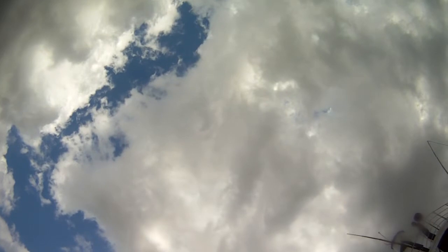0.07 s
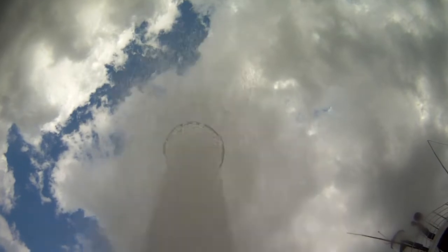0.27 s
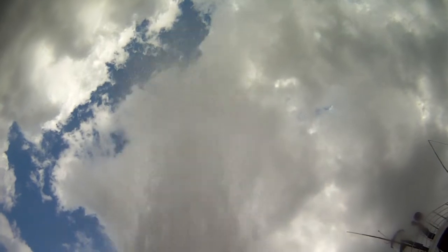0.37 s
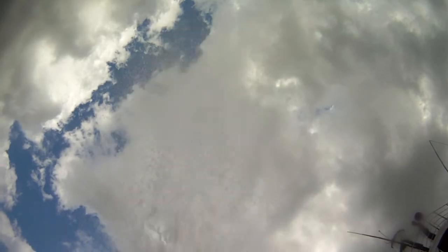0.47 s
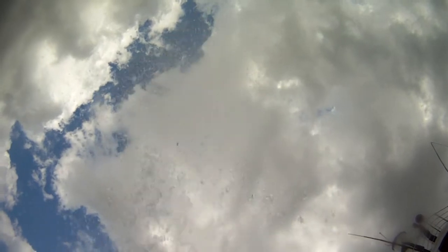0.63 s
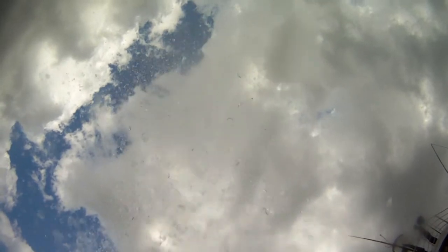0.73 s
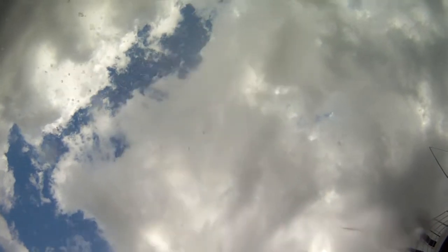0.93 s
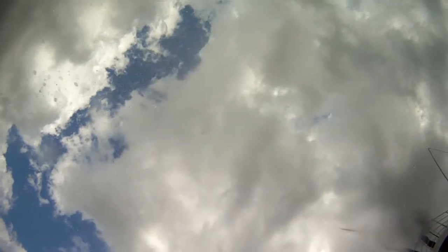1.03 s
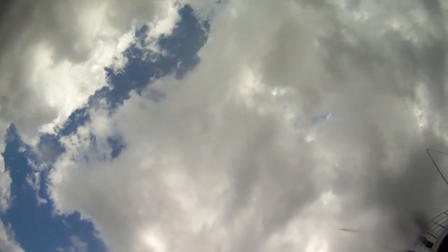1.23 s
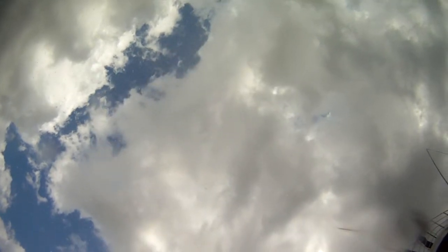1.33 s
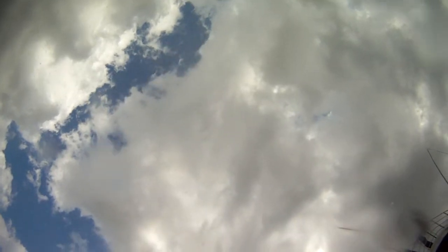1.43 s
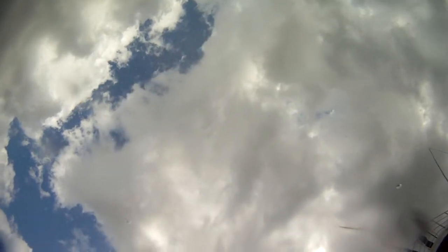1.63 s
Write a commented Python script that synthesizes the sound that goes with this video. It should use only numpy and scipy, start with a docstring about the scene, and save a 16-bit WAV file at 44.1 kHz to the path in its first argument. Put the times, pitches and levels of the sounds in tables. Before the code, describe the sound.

A compressed-air water cannon fires, and its spray rains down, thinning to drops.

```python
"""Compressed-air water cannon

The cannon fires straight up beside a sealed plastic case. The valve clicks, the barrel gulps,
air spits out in three main bursts and the water column leaves with a slap. Spray showers the
case, thins out and ends in single drops. The case colours clicks, air, slap, spray and drops."""
import sys
import numpy as np
from scipy import signal
from scipy.fft import rfft, irfft
from scipy.io import wavfile
from scipy.ndimage import uniform_filter1d, minimum_filter1d

SR = 44100
rng = np.random.default_rng(int(sys.argv[2]) if len(sys.argv) > 2 else 0)


def bounce(signal):
    """Save signal as a 16-bit WAV file at the path given by the first command-line argument."""
    frames = np.transpose(np.atleast_2d(signal))
    limited = np.clip(frames, -1, 1)
    pcm = np.round(limited * 32767).astype(np.int16)
    wavfile.write(sys.argv[1], SR, pcm)


N = 74970

# Spectral shapes. Each row: frequency in Hz, relative gain in dB.
OPEN_AIR_EQ = [(30, 0), (100, -3), (300, -12), (1000, -15), (4000, -24), (8000, -32), (15000, -36)]
RUMBLE_EQ = [(20, -38), (50, -3.5), (95, -0.5), (140, -1), (400, -4.5), (800, -11), (2500, -19),
             (6000, -79)]
PATTER_EQ = [(300, -5.5), (1200, 2.5), (2400, 0), (4500, -11), (6000, -20.5), (10000, -7), (15000, -31)]
CASE_EQ = [(30, -33), (80, -23.5), (180, -10.5), (300, -11.5), (600, -10), (850, -15), (1030, -1.5),
           (1280, 2.5), (1440, 1.5), (1660, 7.5), (1880, 1.5), (2150, 7.5), (2900, -9), (3650, 0),
           (4700, -25.5), (5300, -23.5), (6000, -38.5), (6700, -24.5), (7300, -28.5), (8300, -6.5),
           (9000, -17), (9850, -9), (10900, -16), (12000, -96), (13200, -13), (14150, -13), (15200, -21)]
DROP_BODY_EQ = [(60, 2), (400, 2), (800, -1.5), (1150, 1.5), (1650, -10), (2300, -6), (3600, -4),
                (6000, -16), (8300, -5.5), (14000, 2)]
DROP_TICK_EQ = [(200, -27), (1000, -17), (2800, 0.5), (4500, 9.5), (6000, 19), (8300, 3), (11000, -1.5),
                (15000, -5)]
CLICK_EQ = [(200, -31), (1000, -22), (2000, -19), (3000, -8), (4000, 1), (6000, 2), (8300, -1),
            (10000, -18), (15000, -12)]
SURGE_EQ = [(200, -37), (800, -31), (1150, -10.5), (1500, -15), (1950, -21), (2200, -0.5), (2430, -3.5),
            (2750, -22), (5000, -25.5), (9000, -35), (9900, -19), (11500, -33), (14200, -25), (15500, -48)]
SLAP_EQ = [(60, 8), (300, 16.5), (750, 10), (1150, 0), (1650, -9), (2300, -0.5), (3600, 1.5), (6000, 8),
           (8300, 3), (14000, -1)]
AIR_EQ = [(60, 7), (220, 0), (400, 2.5), (800, 1.5), (1700, -7), (2800, -11.5), (3700, -6), (6000, 8.5),
          (8300, -4.5), (12000, -5.5), (15000, -7)]

# Noise envelopes. Each row: time in seconds, level in dB.
RUMBLE_ENVELOPE = [(0, -71), (.08, -65), (.12, -54.5), (.30, -54), (0.346, -29.5), (.39, -39), (.7, -54),
                   (.98, -47.5), (1.30, -52), (1.69, -52)]
SURGE_ENVELOPE = [(.22, -80), (0.244, -40), (.285, -58), (.30, -45.5), (.325, -39), (.357, -24.5),
                  (.375, -33.5), (.41, -37), (.46, -30), (.52, -85)]
# Spray on the case. Each row: time in seconds, relative body and treble levels in dB.
SPRAY_FLOW = [(.2, -81, -80), (0.281, -50, -55), (.31, -45.5, -46), (.328, -46, -39), (0.341, -40, -52),
              (0.361, -27, -24), (0.374, -40, -37), (.385, -31, -36), (0.418, -14.5, -21),
              (0.439, -11, -16), (0.504, -13, -17), (0.531, -17, -21), (0.6, -15, -14.5), (0.742, -18, -23),
              (.81, -18.5, -21), (0.859, -21.5, -24.5), (0.911, -26, -29), (0.964, -24.5, -29.5),
              (0.989, -30, -37.5), (1.071, -37.5, -44.5), (1.14, -45.5, -57), (1.33, -48.5, -66),
              (1.55, -45.5, -57), (1.69, -45, -57)]

# Case resonances. Each row: frequency in Hz, T60 in seconds, gain over the broad response in dB.
CASE_MODES = [(1016.4, 0.069, 6), (1250.5, 0.12, 8), (1643, 0.08, -0.5), (2092, 0.24, 3.5), (2301, 0.12, 3),
              (2690, 0.063, 1.5), (3540, 0.05, -1), (3814, 0.06, 6.5), (8320, 0.08, 6), (9780, 0.086, 9),
              (14150, 0.046, 1.5)]
WET_CASE_MODES = [(1150, .02, 2), (2230, .02, 0)]
# Modes of the cannon and its air. Each row: frequency in Hz, T60 in seconds, level in dB.
BARREL_MODES = [(94.2, 0.83, -36), (177.7, 0.47, -33), (222, .11, -22.5), (430, 0.099, -38)]
EMPTY_BARREL_MODES = [(175, 0.21, -21.5)]
MUZZLE_MODES = [(68, 0.07, -28), (135, 0.033, -16), (225, 0.026, -7), (340, 0.013, -9), (1080, 0.025, -18)]
CANNON_MODES = [(228.5, 0.055, -9), (415, 0.035, -22), (1152, 0.22, -21.5), (2230, 0.3, -41),
                (9880, 0.19, -37)]
AIR_COLUMN_MODES = [(155.5, 0.2, -23), (307.7, 0.17, -25.5), (464, 0.12, -21.5)]
RECOIL_MODES = [(129, 0.037, -15)]
# Case tones shaken by the air. Each row: frequency in Hz, relative level in dB, RMS wander in Hz.
SQUEAL_TONES = [(2176, -4, 92), (9880, -18, 123), (13900, -22.5, 174)]

# Heavy water landing. Each row: start in seconds, level in dB.
THUD_HITS = [(0.971, -40), (1.226, -38.5), (1.353, -37.5)]
# Water landing in water. Each row: start in seconds, pitch in Hz, T60 in seconds, level in dB.
BUBBLES = [(1.0795, 1215, 0.027, -23), (1.1593, 1290, 0.034, -26.5), (1.1846, 1130, 0.017, -23.5),
           (1.1923, 1130, 0.047, -31), (1.229, 433, .04, -36)]
# Large drops. Each row: start in seconds, relative level in dB, decay in seconds, tick offset in dB.
DROP_HITS = [(.853, -4, 0.0036, -5), (0.9726, -10.5, 0.0028, -8.5), (1.078, -12.5, 0.0046, -22),
             (1.084, -16, 0.0034, -17), (1.14, -26, 0.0083, -6), (1.160, -28.5, 0.0038, -12),
             (1.1786, -28.5, 0.0016, 5.5), (1.22, -29, 0.002, -4), (1.2385, -24, 0.015, -9),
             (1.328, -29.5, 0.002, -10.5), (1.348, -28.5, 0.0027, -4), (1.3548, -21, 0.0015, -13),
             (1.3777, -22.5, 0.0019, 1.5), (1.4115, -24.5, 0.0028, -1), (1.4348, -28, 0.002, 3),
             (1.4486, -21.5, 0.0028, 1.5), (1.4615, -26, 0.0013, 0), (1.478, -29.5, 0.0021, 2),
             (1.4974, -29, 0.0042, 4), (1.507, -26, 0.0034, 0), (1.515, -20.5, 0.0022, -3),
             (1.538, -25, 0.00092, -1), (1.5453, -29, 0.0006, -2), (1.5537, -23.5, 0.0015, -2),
             (1.5815, -24, 0.0011, -7.5), (1.5967, -30, 0.001, -4), (1.634, -25, 0.01, 3),
             (1.6521, -24, 0.00082, -7), (1.668, -26, 0.0018, -10.5)]
# Valve clicks, the first air burst's crack, one late drop. Each row: start in seconds, level in dB.
CLICK_HITS = [(0.0786, -31.5), (0.0836, -35.5), (0.0913, -14.5), (0.0956, -30), (0.105, -27), (0.111, -30),
              (0.1208, -31.5), (0.1266, -35), (.2040, -3), (1.6975, -11)]
# Water slaps. Each row: start in seconds, level in dB, decay in seconds.
SLAP_HITS = [(0.3302, -2.5, 0.0013), (.3310, 8, 0.0014), (0.334, -23.5, 0.025), (0.3419, -12, 0.0025)]
# Air bursts. Each row: centre in seconds, 1/e half-width in seconds, relative level in dB.
AIR_BURSTS = [(0.1933, 0.0023, -18.5), (0.2, 0.0023, -7.5), (0.2063, 0.0016, 6.5), (0.214, 0.0014, -6),
              (0.2186, 0.0015, 8.5), (0.2252, 0.0018, -4), (0.2313, 0.002, 14)]

SLOSH_WAVER, BARREL_ATTACK_S = 0.07, 0.011  # sloshing water bends the barrel's pitch by this share


def undb(db):
    return 10 ** (np.asarray(db) / 20)


def clock():
    return np.arange(N) / SR


def unit_rms(x):
    return x / np.sqrt(np.mean(x ** 2) + 1e-18)


def unit_peak(x):
    return x / np.max(abs(x))


def noise():
    return rng.standard_normal(N)


def envelope(points):
    return undb(np.interp(clock(), *np.array(points).T))


def wobble(rate_hz):
    """Smooth random motion, unit RMS."""
    width = max(int(SR / rate_hz), 2)
    return unit_rms(uniform_filter1d(uniform_filter1d(noise(), width), width))


def response(*curves, size=4096):
    """Minimum-phase, unit-energy impulse response of EQ curves in series."""
    log_hz = np.log(np.arange(size // 2 + 1) * SR / size + 1)
    db = sum(np.interp(log_hz, np.log(eq[:, 0]), eq[:, 1]) for eq in map(np.array, curves))
    cepstrum = irfft(np.log(undb(db)))
    cepstrum[1:size // 2] *= 2
    cepstrum[size // 2 + 1:] = 0
    impulse = irfft(np.exp(rfft(cepstrum)))
    return impulse / np.linalg.norm(impulse)


def through(x, impulse):
    return signal.fftconvolve(x, impulse)[:N]


def hit_case(pushes, eq):
    """Impacts coloured by the case and their own EQ."""
    return through(pushes, unit_peak(response(CASE_EQ, eq)))


def strike(start_s, modes, attack_s, rise_oct_per_s=0, waver=0):
    """Damped sines starting together; waver is RMS pitch deviation as a share."""
    age_s = np.maximum(clock() - start_s, 0)
    rings = 0
    for hz, t60_s, db in modes:
        pitch_hz = hz * 2 ** (rise_oct_per_s * np.minimum(age_s, t60_s))
        pitch_hz *= 1 + waver * wobble(rate_hz=70)
        phase = 2 * np.pi * np.cumsum(pitch_hz * (age_s > 0)) / SR
        rings += undb(db) * np.sin(phase) * np.exp(-np.log(1000) * age_s / t60_s)
    return rings * (1 - np.exp(-age_s / attack_s))


def resonate(x, modes, drift_hz=10):
    """Adds narrow resonances; water on the case keeps shifting their pitch."""
    out = x
    for hz, t60_s, db in modes:
        pole = np.exp(-np.log(1000) / t60_s / SR)
        carrier = np.exp(2j * np.pi * np.cumsum(hz + drift_hz * wobble(rate_hz=25)) / SR)
        ringing = carrier * signal.lfilter([1], [1, -pole], x / carrier)
        out = out + 2 * undb(db) * (1 - pole) * ringing.real
    return out


def splat(start_s, decay_s, splash):
    """A sharp push, then a dying noise burst."""
    age_s = clock() - start_s
    push = np.maximum(1 - abs(age_s * SR), 0)
    burst = noise() * (age_s >= 0) * np.exp(-np.maximum(age_s, 0) / decay_s)
    return push + splash * burst


def grains(flow_db, ref_db=-14, ref_per_s=11000, db_per_decade=24.5, spread_db=3.5):
    """Tiny impacts near unit RMS; weaker flow makes them sparser."""
    rate_per_s = ref_per_s * 10 ** ((flow_db - ref_db) / db_per_decade)
    chance = np.minimum(rate_per_s / SR, 1)
    sizes = undb(spread_db * np.minimum(rng.exponential(size=N), 4)) * np.sign(noise())
    return unit_rms(sizes) * (rng.random(N) < chance) / np.sqrt(chance)


def background():
    """Low buffeting of water and wind over quiet open air."""
    rumble = through(noise(), response(RUMBLE_EQ)) * envelope(RUMBLE_ENVELOPE)
    return rumble + undb(-63.5) * through(noise(), response(OPEN_AIR_EQ))


def patter(start_s=0.48, full_s=1.49):
    """Fine drops fall on the ground all around."""
    swell = np.interp(clock(), [start_s, full_s], [0, 1])
    flicker_db = 2.3 * wobble(rate_hz=120)
    return undb(-48.5 + flicker_db) * swell * through(grains(flow_db=-27), response(PATTER_EQ))


def thuds(hz=95.8, t60_s=0.21):
    """Heavy water lands softly."""
    return sum(strike(s, [(hz, t60_s, db)], attack_s=0.0038) for s, db in THUD_HITS)


def plops():
    """Trapped bubbles ring briefly."""
    return sum(strike(s, [(hz, t60_s, db)], attack_s=0.00049) for s, hz, t60_s, db in BUBBLES)


def barrel_hum():
    """The emptied barrel hums as the spray arrives."""
    return strike(start_s=0.415, modes=EMPTY_BARREL_MODES, attack_s=0.0058)


def drops():
    """Large drops splat on and around the case: dull body, bright tick."""
    bodies = sum(undb(db) * splat(s, decay_s, splash=0.17) for s, db, decay_s, _ in DROP_HITS)
    ticks = sum(undb(db + tick_db) * splat(s, decay_s, splash=0.21)
                for s, db, decay_s, tick_db in DROP_HITS)
    dull = resonate(hit_case(bodies, DROP_BODY_EQ), WET_CASE_MODES)
    return undb(-5) * dull + undb(-10.5) * hit_case(ticks, DROP_TICK_EQ)


def spray(grit_band_hz=(2660, 8100), grit_step_s=0.472):
    """Droplets shower the case; fine ones bring the treble just after the heavy ones."""
    t = clock()
    times_s, *levels_db = np.array(SPRAY_FLOW).T
    body_db, treble_db = (np.interp(t, times_s, db) for db in levels_db)
    hits = grains(body_db) + undb(-7.5) * noise()
    body, body_and_grit = (signal.sosfiltfilt(signal.butter(6, hz, fs=SR, output="sos"), hits)
                           for hz in grit_band_hz)
    grit = (body_and_grit - body) * undb(np.where(t > grit_step_s, 1, -9.5))
    fizz = hits - body_and_grit
    pushes = body * undb(body_db - 2.5) + (grit + fizz) * undb(treble_db + 2.5)
    return resonate(through(pushes, response(CASE_EQ)), CASE_MODES)


def clicks():
    """Sharp clicks on the case: the valve, the first air burst's crack, and one late drop."""
    pushes = sum(undb(db) * splat(s, decay_s=0.0023, splash=0.19) for s, db in CLICK_HITS)
    return hit_case(pushes, CLICK_EQ)


def gulp():
    """The barrel's air column rings as the valve opens."""
    return strike(start_s=0.096, modes=BARREL_MODES, attack_s=BARREL_ATTACK_S, waver=SLOSH_WAVER)


def surge():
    """Water races up the barrel with a hollow rush."""
    return through(noise(), response(SURGE_EQ)) * envelope(SURGE_ENVELOPE)


def slap():
    """The water column breaks out: a crack and a muzzle thump."""
    pushes = sum(undb(db) * splat(s, decay_s, splash=0.15) for s, db, decay_s in SLAP_HITS)
    thump = strike(start_s=0.3303, modes=MUZZLE_MODES, attack_s=0.00047)
    return hit_case(pushes, SLAP_EQ) + thump


def kick(start_s=0.2):
    """The cannon rings and recoils; air above the climbing water shortens and rises in pitch."""
    column = strike(start_s, AIR_COLUMN_MODES, BARREL_ATTACK_S, rise_oct_per_s=3.9, waver=SLOSH_WAVER / 2)
    ring = strike(start_s, CANNON_MODES, attack_s=0.0037, waver=0.014)
    recoil = strike(start_s=0.226, modes=RECOIL_MODES, attack_s=0.0034)
    return column + ring + recoil


def blast(crest_s=0.22, rise_s=0.016, fall_s=0.013, fade_in_s=(0.16, 0.18), wander_hz=680):
    """Air swells and spits in bursts that make the case squeal."""
    t = clock()
    rush = undb(-12) / (np.exp((crest_s - t) / rise_s) + np.exp((t - crest_s) / fall_s))
    rush *= np.interp(t, fade_in_s, [0, 1])
    bursts = sum(undb(db) * np.exp(-((t - s) / width_s) ** 2) for s, width_s, db in AIR_BURSTS)
    squeal = 0
    for hz, db, depth_hz in SQUEAL_TONES:
        pitch_hz = hz + depth_hz * wobble(wander_hz)
        squeal += undb(db) * np.sin(2 * np.pi * np.cumsum(pitch_hz) / SR)
    air = undb(-14) * through(noise(), response(CASE_EQ, AIR_EQ))
    squeal *= undb(0.86 * wobble(wander_hz))
    return (rush + bursts) * (squeal + air)


def scene():
    shot = clicks() + gulp() + blast() + kick() + surge() + slap()
    aftermath = spray() + drops() + plops() + barrel_hum() + thuds() + patter()
    return (shot + aftermath + background())[None]


def record(dry, window_s=0.0008, cutoff_hz=15350):
    """Fast peak limiter, then a steep low-pass."""
    width = int(window_s * SR)
    needed_gain = 1 / np.maximum(abs(dry), 1)
    gain = uniform_filter1d(minimum_filter1d(needed_gain, width), width)
    lowpass = signal.ellip(12, 0.2, 95, cutoff_hz, fs=SR, output="sos")
    return signal.sosfilt(lowpass, dry * gain)


dry = scene()
out = record(dry)
bounce(out)
```